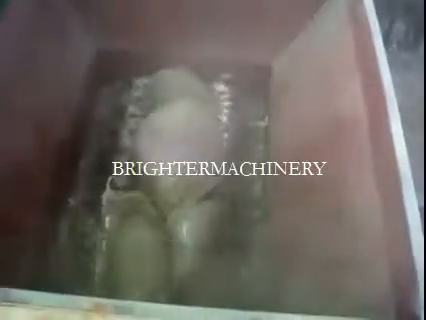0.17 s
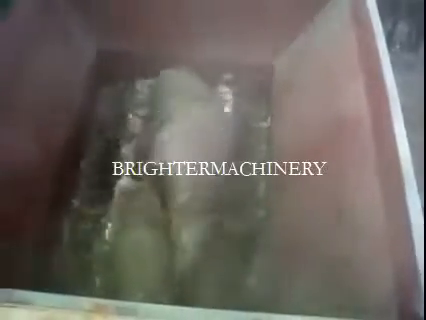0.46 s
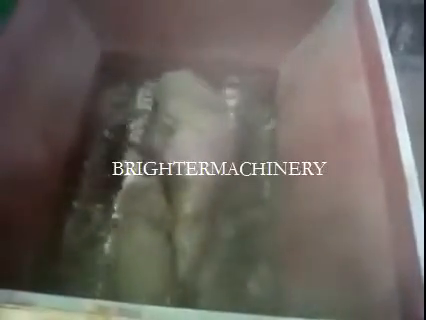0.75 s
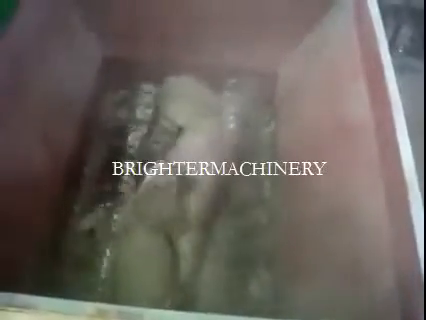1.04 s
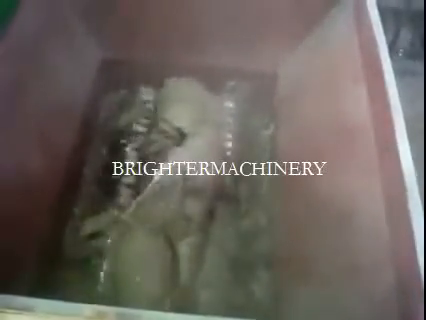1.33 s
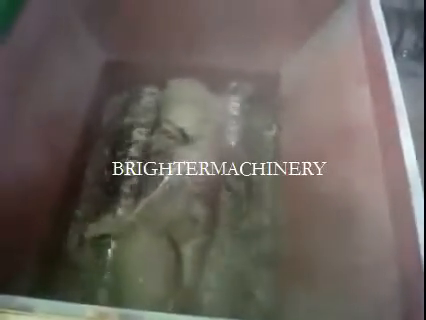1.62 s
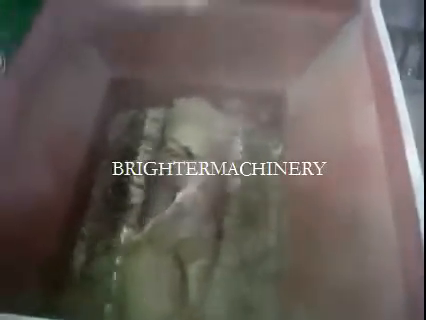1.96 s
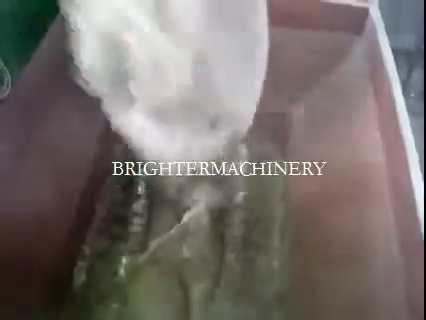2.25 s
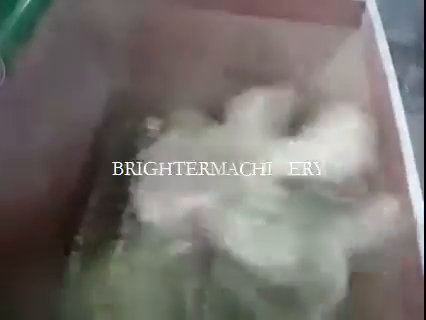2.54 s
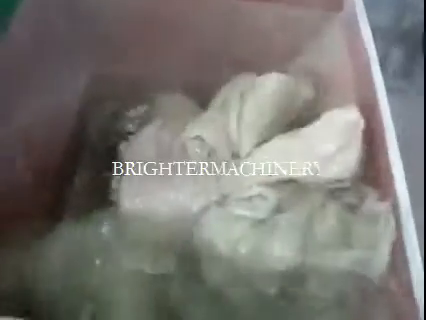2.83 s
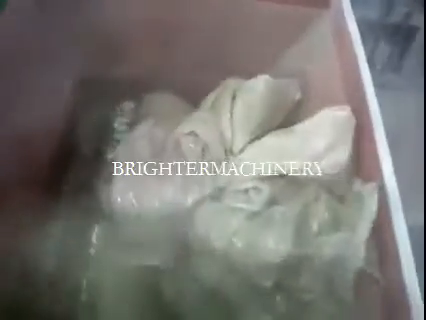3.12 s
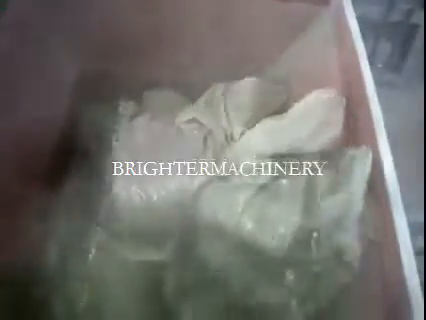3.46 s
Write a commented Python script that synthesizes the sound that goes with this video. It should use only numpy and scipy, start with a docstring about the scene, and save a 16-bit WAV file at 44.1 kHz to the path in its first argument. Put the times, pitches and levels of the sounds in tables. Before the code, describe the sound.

Slow shredder grinding plastic sacks, low motor roar with crackles, metallic knocks and tearing bursts.

```python
"""In a steel hopper, a slow heavy shredder chews plastic film, heard on one microphone from the rim.
The drive roars and growls in the frame: coloured noise whose loudness wobbles with the load.
Teeth hiss as noise and ring the steel wall as fading sines; the film crackles, pings and tears.
Near 2.4 s a bundle of sacks is thrown in, heard as a cluster of tears. Low air rumble grows later.
The recorder's gain control ducks everything after loud bursts, and weak treble flickers."""
import sys
import numpy as np
from scipy import signal
from scipy.fft import rfft, irfft, next_fast_len
from scipy.io import wavfile
from scipy.ndimage import uniform_filter1d, map_coordinates

SR = 44100
rng = np.random.default_rng(int(sys.argv[2]) if len(sys.argv) > 2 else 0)


def dump_mix(stems):
    """Bounce the given channels to the path in sys.argv[1] as a 16-bit WAV at rate SR."""
    frames = np.atleast_2d(stems).T  # one column per channel
    limited = np.clip(frames, -1, 1)  # hard clip at full scale
    pcm = np.round(limited * 32767).astype(np.int16)
    wavfile.write(sys.argv[1], SR, pcm)


def ratio(d):
    """dB to gain"""
    e = np.asarray(d, float) / 20
    return 10 ** e


N = 158319  # samples in the scene

# Load on the drive. Each row: time in seconds, relative level of the roar in dB.
DRIVE_LOAD = [(0.0, -21), (.2, -23), (.3, -21), (0.77, -21), (0.98, -20.5), (1.97, -22), (2.03, -19),
              (2.07, -25), (2.42, -20.5), (2.53, -33), (2.57, -25.5), (3.13, -21), (3.19, -23),
              (3.26, -19.5), (3.57, -22), (3.59, -14.5)]
# Growl of the gears. Each row: time in seconds, relative level in dB.
GEAR_GROWL = [(0, -41.5), (.7, -31.5), (1.2, -45), (1.9, -27.5), (2.03, -24.5), (2.08, -33), (2.55, -31.5),
              (2.8, -25.5), (3.1, -24), (3.18, -26.5), (3.35, -24.5), (3.59, -25.5)]
# Bite of the teeth. Each row: time in seconds, relative level in dB.
TOOTH_BITE = [(0, -27.5), (.25, -26.5), (.42, -23), (.55, -23.5), (.75, -22.5), (.95, -24), (1.26, -25),
              (1.5, -24), (2.05, -24.5), (2.12, -26.5), (2.34, -25.5), (2.41, -20.5), (2.46, -25),
              (2.49, -19.5), (2.54, -23), (2.62, -27.5), (2.8, -27.5), (3.15, -21.5), (3.3, -25.5),
              (3.59, -23.5)]
# Crackle of the film. Each row: time in seconds, relative level in dB.
FILM_CRACKLE = [(0, -26.5), (.18, -27.5), (.37, -23), (.5, -26.5), (.58, -22.5), (.66, -24.5), (.77, -25.5),
                (1.04, -26), (1.15, -26), (1.33, -26.5), (1.45, -24), (1.75, -26.5), (1.93, -27),
                (2.18, -27), (2.4, -25), (2.455, -23), (2.54, -24), (2.6, -27), (2.67, -27.5),
                (2.76, -29.5), (2.9, -28), (3.05, -27), (3.17, -30), (3.28, -25), (3.42, -25),
                (3.59, -26.5)]
# Rumble of moving air. Each row: time in seconds, relative level in dB.
AIR_LEVEL = [(0, -67), (.5, -51), (1, -62), (2, -54.5), (2.3, -48), (2.55, -41), (2.8, -35), (3.2, -34),
             (3.59, -38)]
# Tone colour of the roaring frame. Each row: frequency in Hz, relative gain in dB.
FRAME_COLOUR = [(25, -52), (80, -24.5), (150, -6.5), (220, -2.5), (300, 1), (350, -1), (400, -3.5),
                (460, 1.5), (620, -7), (900, -10.5), (3000, -92)]
# Tone colour of the gears. Each row: frequency in Hz, relative gain in dB.
GEAR_COLOUR = [(250, -30), (300, -5), (345, -12), (385, 3), (415, -6), (450, -3), (500, -30)]
# Tone colour of the tooth noise in the hopper. Each row: frequency in Hz, relative gain in dB.
HOPPER_COLOUR = [(200, -14.5), (600, -8.5), (850, 4), (1000, 2.5), (1250, 1), (1500, -6), (2500, -18),
                 (6000, -72.5)]
# Tone colour of the crackle as heard, with a steep treble cut-off at the end.
# Each row: frequency in Hz, relative gain in dB.
CRACKLE_COLOUR = [(300, -28), (1000, 0.5), (1800, 2), (2500, 0), (3200, 0.5), (5000, -2), (7000, -3.5),
                  (9400, -5.5), (10000, -11.5), (10450, -16.5), (10500, -63)]
# Tone colour of the air rumble. Each row: frequency in Hz, relative gain in dB.
AIR_COLOUR = [(15, 2), (40, -8), (80, -11.5), (135, 0), (210, -3.5), (300, -32), (600, -50)]
# Tooth knocks. Each row: start in seconds, relative strength in dB,
# frequency in Hz of the wall tones struck best.
TOOTH_KNOCKS = [(0.275, -11, 1000), (0.413, -6, 1000), (0.721, 0, 3100), (0.736, -6, 1000),
                (0.937, -8, 900), (0.9915, 0, 800), (1.081, -4, 2080), (1.167, -11, 1200),
                (1.269, -9, 1000), (1.884, -9, 900), (2.057, -3, 870), (2.677, -10, 1000),
                (2.85, -10, 2000), (2.929, -9, 1100), (2.99, -11, 1000), (3.078, -7, 870),
                (3.173, -8, 1000)]
# Tones of the hopper wall. Each row: middle frequency in Hz, relative level in dB,
# time in seconds to fade by 60 dB.
WALL_TONES = [(633, 4, 0.012), (864, -5, 0.03), (983, 5, 0.024), (1222, -2.5, 0.03), (2042, -4, 0.032),
              (2695, -2, 0.041), (3000, -5.5, .025)]
# Tears and slaps of film. Each row: start in seconds, relative level in dB,
# time in seconds until it starts to fade, centre frequency in Hz.
FILM_TEARS = [(0.036, -23, 0.0049, 4550), (0.091, -23, 0.011, 3500), (0.287, -30, 0.0095, 4000),
              (0.354, -27.5, 0.017, 5000), (0.55, -27.5, 0.036, 5030), (0.815, -31, 0.01, 3000),
              (0.929, -24, 0.017, 3700), (1.085, -23, 0.0096, 3500), (1.38, -28.5, 0.05, 3950),
              (1.804, -21.5, 0.041, 2960), (2.0486, -16, 0.012, 3850), (2.087, -32, 0.018, 5300),
              (2.363, -25, 0.028, 5160), (2.402, -21, 0.032, 4000), (2.473, -20.5, 0.035, 4530),
              (2.478, -21.5, 0.021, 1400), (2.514, -19, .024, 3200), (3.427, -25, 0.013, 3000)]
# Weakest treble that stays audible. Each row: frequency in Hz, limit in dB against the mean level at 8 kHz.
TREBLE_LIMIT = [(3000, -11), (7000, -9), (9000, -7), (9600, -5.5), (10500, -5)]


def unit(x):
    """Scale a sound to rms 1."""
    return x / np.sqrt(np.mean(x ** 2) + 1e-20)


def curve(rows):
    """Join (seconds, dB) rows with straight lines and give the gain for each sample."""
    s, db = np.transpose(rows)
    return ratio(np.interp(np.arange(N) / SR, s, db))


def wobble(rate):
    """A smooth random curve through `rate` random points a second."""
    points = rng.standard_normal(int(N * rate / SR) + 4)
    return map_coordinates(points, [np.arange(N) * rate / SR])


def coloured(x, points):
    """Shape the spectrum of x by (Hz, dB) points on a log frequency axis, then scale to rms 1."""
    m = next_fast_len(N + 8192)
    hz, db = np.transpose(points)
    log_hz = np.log(np.fft.rfftfreq(m, 1 / SR) + 1)
    gain = ratio(np.interp(log_hz, np.log(hz + 1), db))
    return unit(irfft(rfft(x, m) * gain, m)[:N])


def gritty(per_s, spread_db, share, patchy_db):
    """Patchy white noise mixed with single clicks of scattered size; share is the clicks' part of the power."""
    z = signal.stft(rng.standard_normal(N), nperseg=512)[2]
    patches = uniform_filter1d(rng.standard_normal(z.shape), size=8, axis=0)
    patches = uniform_filter1d(patches, size=6, axis=1)
    hiss = signal.istft(z * ratio(patchy_db * unit(patches)), nperseg=512)[1][:N]
    draw = rng.random(N)
    size = np.minimum(rng.exponential(size=N), 4)
    hit = np.clip(1 - draw * SR / per_s, 0, 1)  # zero at most samples
    clicks = hit * ratio(spread_db * size) * rng.standard_normal(N)
    share = np.clip(share, 0, 1)
    return np.sqrt(1 - share) * unit(hiss) + np.sqrt(share) * unit(clicks)


def drive_roar():
    """Motor and gearbox shake the frame into a broad low roar that follows the load."""
    grain = gritty(per_s=450, spread_db=1.5, share=0.34, patchy_db=1.0)
    grind = ratio(0.37 + 0.11 * wobble(9) + 1.2 * wobble(27.7))
    return curve(DRIVE_LOAD) * grind * coloured(grain, FRAME_COLOUR)


def gear_growl():
    """The gears add a growl, noise in a narrower band, that rises and falls under load."""
    growl = coloured(rng.standard_normal(N), GEAR_COLOUR)
    return curve(GEAR_GROWL) * ratio(0.29 * wobble(10.0)) * growl


def tooth_contacts():
    """Dense small contacts of the teeth merge into a hiss coloured by the hopper."""
    grain = gritty(per_s=590, spread_db=2.5, share=0.18, patchy_db=-2.0)
    flutter = ratio(0.2 + 1.1 * wobble(10))
    return curve(TOOTH_BITE) * flutter * coloured(grain, HOPPER_COLOUR)


def film_pings():
    """Taut scraps of film ring briefly as they snap, at random times and pitches."""
    pings_per_s, middle_hz, spread_oct = 500, 2602, .9
    fade_cycles = 45  # cycles to fall by 20 dB
    when, pitch, strength = rng.random((3, int(pings_per_s * N / SR), 1))
    octaves_off = spread_oct * np.log(pitch / (1 - pitch)) / 2
    hz = np.clip(middle_hz * 2 ** octaves_off, 500, 9500)
    t = np.arange(SR // 50) / SR
    fade = ratio(-2.1 * np.log(strength + .06) - 60 * t * hz / fade_cycles / 3)
    onset = 1 - np.exp(-t * hz / 2)
    rings = fade * np.sin(2 * np.pi * hz * t) * onset
    at = (when * N).astype(int) + np.arange(len(t))
    return unit(np.bincount(at.ravel(), rings.ravel(), N)[:N])  # add all rings together


def film_crackle():
    """Crumpling film crackles as coloured hiss and small clicks, with pings on top, fluttering in level."""
    grain = gritty(per_s=2000, spread_db=2.5, share=0.049, patchy_db=2.0)
    crackle = coloured(grain, CRACKLE_COLOUR) + ratio(-5.5) * film_pings()
    flutter = ratio(2.0 + .5 * wobble(15) + 1.15 * wobble(39.97))
    return curve(FILM_CRACKLE) * flutter * crackle


def wall_knocks():
    """Random clatter and the strongest tooth knocks ring the wall, most in tones near the struck pitch."""
    clatter_per_s, clatter_db = 45, -17
    blow_gain_db, attack_s, off_db_per_oct = -5, .0008, 10
    blows = list(TOOTH_KNOCKS)
    for u, v, w in rng.random((int(clatter_per_s * N / SR), 3)):
        blows.append((u * N / SR, clatter_db + 4.2 * v, 700 * 2 ** (2 * w * w)))
    out = np.zeros(N + SR)
    t = np.arange(SR // 16) / SR
    hz, level_db, t60 = np.transpose(WALL_TONES)[:, :, None]
    for s, db, struck_hz in blows:
        level_draw, pitch_draw = rng.standard_normal((2, len(WALL_TONES), 1))
        off_db = off_db_per_oct * np.abs(np.log2(hz / struck_hz))
        fade = ratio(level_db + 2 * level_draw - off_db - 60 * t / t60)
        ring = fade * np.sin(2 * np.pi * hz * (1 + .04 * pitch_draw) * t)
        onset = 1 - np.exp(-t / attack_s)
        out[round(s * SR):][:len(t)] += ratio(db + blow_gain_db) * ring.sum(axis=0) * onset
    return out[:N]


def film_tears():
    """Film tears in short flares of gritty noise, each in a band around its own pitch."""
    attack_s, release_s, width_oct = .003, .007, .9
    tearing = np.pad(gritty(per_s=900, spread_db=2, share=.3, patchy_db=2.5), (0, SR))
    t = np.arange(SR // 8) / SR
    octave = np.log2(np.fft.rfftfreq(len(t), 1 / SR) + 1)
    below_cutoff = octave < np.log2(CRACKLE_COLOUR[-2][0])  # tears stop at the treble cut-off
    out = np.zeros(N + SR)
    for s, db, hold_s, hz in FILM_TEARS:
        start = round(s * SR)
        flare = np.clip(t / attack_s, 0, 1) * np.exp(-np.clip(t - hold_s, 0, None) / release_s)
        band = np.exp(-.5 * ((octave - np.log2(hz)) / width_oct) ** 2) * below_cutoff
        rip = unit(irfft(rfft(tearing[start:][:len(t)]) * band, len(t)))
        out[start:][:len(t)] += ratio(db) * flare * rip
    return out[:N]


def air():
    """Moving air makes a deep unsteady rumble, stronger once the hopper is full."""
    rumble = coloured(rng.standard_normal(N), AIR_COLOUR)
    return curve(AIR_LEVEL) * ratio(3.1 * wobble(16)) * rumble


def scene():
    """Add all sources; one microphone feeds both channels."""
    machine = drive_roar() + gear_growl() + tooth_contacts()
    mono = machine + film_crackle() + wall_knocks() + film_tears() + air()
    return np.tile(mono, (2, 1))


def gain_control(x):
    """Gain drops at once when the level passes a threshold, then recovers slowly."""
    threshold_db, cut_per_db = -20.5, 0.2
    sense_s, recover_s = 0.0045, 0.096
    power = np.abs(uniform_filter1d(x ** 2, max(int(sense_s * SR), 1)))
    level_db = 10 * np.log10(power + 1e-12)
    cut_db = cut_per_db * np.clip(level_db - threshold_db, 0, None)
    # Each cut shrinks exponentially; at every moment the largest one still left counts.
    fall = np.arange(N) / SR / recover_s
    held_db = np.exp(np.maximum.accumulate(np.log(cut_db + 1e-6) + fall) - fall)
    return x * ratio(-held_db)


def cut_bass(x):
    """A second-order high-pass filter at 67.5 Hz thins the deep bass."""
    return signal.sosfilt(signal.butter(2, 67.5, 'high', fs=SR, output='sos'), x)


def round_peaks(x):
    """Peaks bend smoothly towards a ceiling, given as a part of full scale."""
    ceiling, knee = .62, 4
    return x / (1 + np.abs(x / ceiling) ** knee) ** (1 / knee)


def flicker(x):
    """The treble flickers: small patches of time and frequency that are too weak fall silent."""
    hz, _, z = signal.stft(x, SR, nperseg=1536)
    power = uniform_filter1d(np.abs(z) ** 2, size=4, axis=0)
    mean_power = power[np.argmin(np.abs(hz - 8000))].mean()
    edge_hz, edge_db = np.transpose(TREBLE_LIMIT)
    limit_db = np.interp(hz, edge_hz, edge_db, left=-90)  # far lower limit below the first row
    gate = mean_power * ratio(2 * limit_db)  # doubled dB because it scales power
    return signal.istft(z * (power > gate[:, None]), SR, nperseg=1536)[1][:N]


def low_pass(x):
    """Removes everything above the highest recorded frequency."""
    return signal.sosfilt(signal.butter(12, 10730, fs=SR, output="sos"), x)


def record(dry):
    """The recorder controls the gain, cuts deep bass and rounds peaks; apart from that, weak treble flickers."""
    steadied = gain_control(dry[0])
    soft = round_peaks(cut_bass(steadied))
    mix = np.tile(flicker(soft), (2, 1))
    return low_pass(mix)


dry = scene()
out = record(dry)
dump_mix(out)
```